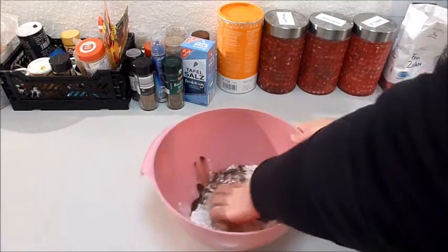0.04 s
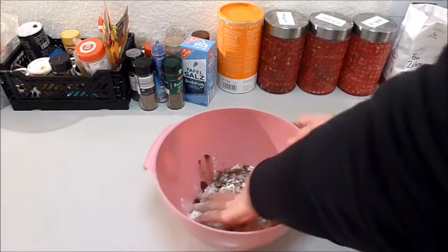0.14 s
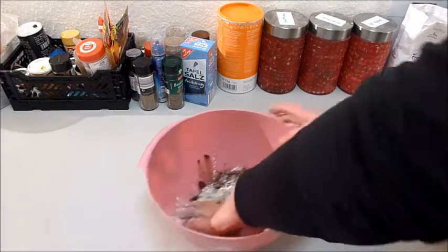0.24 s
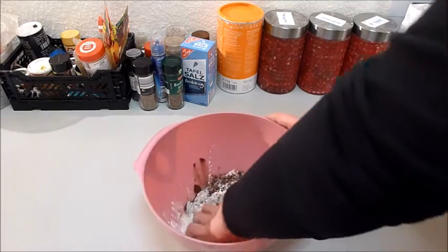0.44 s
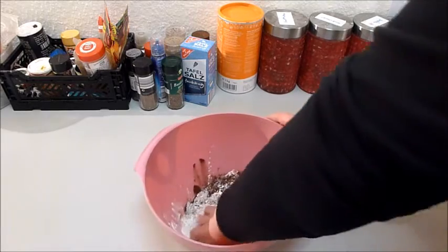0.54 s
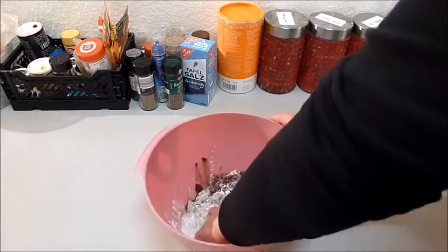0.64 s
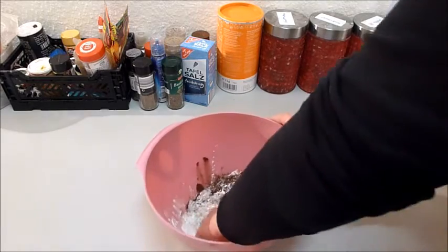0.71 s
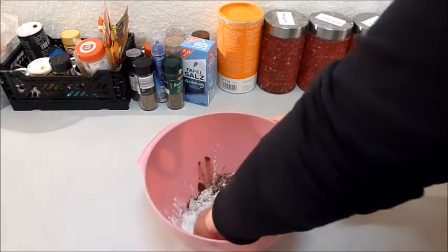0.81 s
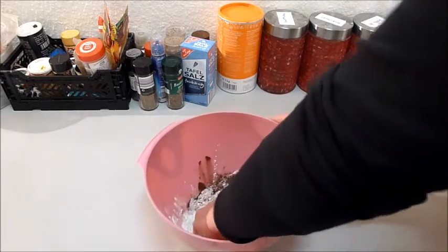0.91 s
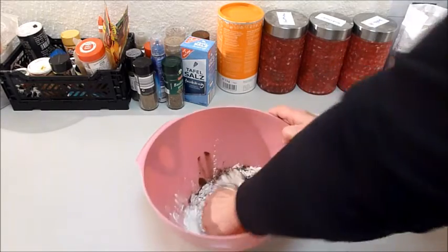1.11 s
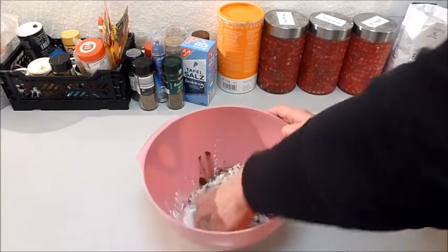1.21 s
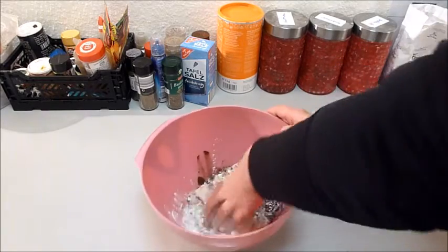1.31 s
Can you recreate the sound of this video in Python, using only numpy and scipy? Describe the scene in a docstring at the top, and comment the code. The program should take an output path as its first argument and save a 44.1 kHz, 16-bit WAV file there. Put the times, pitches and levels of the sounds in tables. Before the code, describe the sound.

Flour and butter being worked by hand in a plastic bowl, with one hollow knock.

```python
"""Working dough in a plastic bowl

A hand works flour and butter on a kitchen worktop. Crumbs rub and tick along the wall, dough gives
dully under the palm, flour swishes and a buttery finger squeaks. The bowl groans as it drags; once it
tips and knocks, ringing its modes. The small hard room rings on. Mono, with no top."""
import sys
import numpy as np
from scipy import signal
from scipy.fft import rfft, irfft
from scipy.io import wavfile

SR = 44100
rng = np.random.default_rng(int(sys.argv[2]) if len(sys.argv) > 2 else 0)


def bounce(signal):
    """Save signal as a 16-bit WAV file at the path given by the first command-line argument."""
    frames = np.transpose(np.atleast_2d(signal))
    limited = np.clip(frames, -1, 1)
    pcm = np.round(limited * 32767).astype(np.int16)
    wavfile.write(sys.argv[1], SR, pcm)


N = 59535
T = np.arange(N) / SR
CUTOFF_HZ = 8250

# finger strokes along the wall: (time [s], relative level [dB])
RUB_ENVELOPE = [(0, -52.5), (.145, -50), (.172, -39), (.205, -46), (.235, -39), (.275, -38.5),
                (.365, -40.5), (.41, -44), (.52, -39), (.58, -44.5), (.66, -40.5), (.722, -42.5),
                (.765, -51), (.89, -51.5), (.95, -43.5), (.99, -50), (1.05, -49), (1.1, -51.5),
                (1.155, -47.5), (1.2, -51.5), (1.35, -57)]
# rubbing spectrum: (frequency [Hz], relative level [dB])
RUB_SPECTRUM = [(150, -29.5), (350, -2), (800, -5), (1400, -1.5), (2500, 3.5), (3600, -2), (5000, -9.5),
                (6500, -18.5), (7500, -39.5)]
# wall resonances: (frequency [Hz], width [Hz], gain [dB])
WALL_MODES = [(1171, 32, 4.5), (1224, 72, -6.5), (1688, 81, -4), (1793, 77, -4)]
# palm on the dough: (time [s], level [dB])
PRESS_ENVELOPE = [(0, -49.5), (.14, -56), (.25, -41.5), (.5, -52.5), (.72, -51.5), (.84, -53), (1.0, -55.5),
                  (1.19, -53.5), (1.29, -52.5), (1.35, -54)]
# pressed dough spectrum: (frequency [Hz], relative level [dB])
PRESS_SPECTRUM = [(60, -45), (95, -20.5), (170, -11.5), (260, -5.5), (350, -0.5), (520, 4.5), (750, -0.5),
                  (1200, -3.5), (3000, -29.5)]
# room noise spectrum: (frequency [Hz], relative level [dB])
ROOM_NOISE_SPECTRUM = [(25, -29.5), (60, -27), (100, -14), (320, 4.5), (1000, 2.5), (3000, -3.5),
                       (6000, -11), (7500, -35)]
# bowl dragging on the worktop: (peak time [s], half-width [s], pitch [Hz], level [dB])
BOWL_DRAGS = [(0.014, 0.0094, 481, -51), (.505, 0.039, 338, -55.5), (0.578, 0.02, 374, -47),
              (1.229, 0.0081, 345, -48.5), (1.31, 0.041, 370.8, -54)]
# crumbs snapping on the wall: (time [s], relative level [dB])
CRUMB_SNAPS = [(.09, -43.5), (0.165, -40), (0.2217, -43), (0.31, -40), (0.373, -36.5), (.694, -37)]
# plastic crack spectrum: (frequency [Hz], relative level [dB])
CRACK_SPECTRUM = [(100, -14), (400, -7.5), (1000, -3.5), (2000, 4), (2700, 1.5), (3600, -5.5), (5000, -11),
                  (6500, -18.5), (7500, -33)]
# bowl hitting the worktop: (time [s], thud gain [dB], crack gain [dB])
BOWL_KNOCKS = [(.2418, -39, -35.5), (.2520, -24, -36), (.2575, -10.5, -24.5), (0.26, -36, -23.5),
               (0.277, -36.5, -30), (0.3363, -29, -40)]
# bowl modes: (frequency [Hz], relative level [dB], T60 [s])
BOWL_MODES = [(104, -32, 0.14), (220.6, -26, 0.099), (433, -11, 0.014), (491.4, -8, 0.18),
              (550.5, -11.5, 0.17), (613.4, -17.5, 0.32), (772, -31, 0.32), (1080, -20.5, 0.064),
              (1517, -19, 0.086), (1767, -17, 0.091), (1916, -19, 0.15), (2320, -31.5, .07),
              (2405, -23, 0.1), (2675, -26.5, 0.11)]
# finger squeaking up the wall: (time [s], pitch [Hz], level [dB])
SQUEAK_PATH = [(0.276, 1377, -67), (0.291, 1540, -44.5), (0.31, 1810, -48), (0.326, 1837, -53.5),
               (.345, 1810, -48.5), (0.371, 1830, -72.5)]
# dry flour swishes: (peak time [s], half-width [s], level [dB])
FLOUR_SWISHES = [(0.339, 0.054, -49), (0.516, 0.081, -56), (1.125, 0.0092, -58), (1.155, .025, -62)]
# flour spectrum: (frequency [Hz], relative level [dB])
SWISH_SPECTRUM = [(1000, -28.5), (3000, -6), (5000, 7), (6500, -4.5), (7500, -15)]


def from_db(db):
    """Decibels to gain."""
    return 10 ** (np.asarray(db) / 20)


def unit_rms(x):
    """Scale to unit rms."""
    return x / np.sqrt(np.mean(x ** 2) + 1e-20)


def coloured(x, spectrum):
    """Minimum-phase filter: given spectrum, rolled off at CUTOFF_HZ, unit power gain."""
    hz, db = np.transpose(spectrum)
    bins_hz = np.maximum(np.fft.rfftfreq(2 * N, 1 / SR), 1)
    shape = from_db(np.interp(np.log(bins_hz), np.log(hz), db))
    gain = unit_rms(shape / (1 + (bins_hz / CUTOFF_HZ) ** 20))
    cepstrum = irfft(np.log(gain + 1e-6))
    causal_fold = np.concatenate([[1], np.full(N - 1, 2), [1], np.zeros(N - 1)])
    return irfft(rfft(x, 2 * N) * np.exp(rfft(cepstrum * causal_fold)))[:N]


def drift(rate_hz):
    """Smooth random wander, unit rms."""
    r = np.exp(-2 * np.pi * rate_hz / SR)
    return unit_rms(signal.lfilter([1], [1, -2 * r, r * r], rng.standard_normal(2 * N))[N:])


def resonance(x, hz, width_hz):
    """Band-pass, unit peak gain."""
    r = np.exp(-np.pi * width_hz / SR)
    feedback = [1, -2 * r * np.cos(2 * np.pi * hz / SR), r * r]
    return signal.lfilter(np.array([1, 0, -1]) * (1 - r * r) / 2, feedback, x)


def decay(start_s, t60_s):
    """Step to 1, then exponential decay."""
    return (T >= start_s) * np.exp(-np.log(1000) * np.maximum(T - start_s, 0) / t60_s)


def swell(peak_s, half_width_s):
    """Gaussian envelope, 1/e at the half-width."""
    return np.exp(-((T - peak_s) / half_width_s) ** 2)


def tone(pitch_hz):
    """Unit-rms sine along a pitch curve."""
    return np.sqrt(2) * np.sin(2 * np.pi * np.cumsum(pitch_hz) / SR)


def impulses(times_s, levels_db):
    """One impulse per contact."""
    out = np.zeros(N)
    np.add.at(out, (np.asarray(times_s) * SR).astype(int), from_db(levels_db))
    return out


def grains(slips_per_s=2500, spread_db=1, powder_db=-1, judder_db=1.4, judder_hz=15):
    """Tiny uneven slips over a powdery hiss, in a juddering flow."""
    sizes = from_db(spread_db * np.minimum(rng.exponential(1, N), 4)) * rng.choice([-1, 1], N)
    slips = unit_rms(sizes * (rng.random(N) < slips_per_s / SR))
    powder = from_db(powder_db) * rng.standard_normal(N)
    judder = from_db(judder_db * drift(judder_hz))
    return unit_rms((slips + powder) * judder)


def rubbing(gain_db=-1.5):
    """Crumbs slide along the plastic and excite the wall."""
    friction = coloured(grains(), RUB_SPECTRUM)
    wall = sum(from_db(db) * resonance(friction, hz, width_hz) for hz, width_hz, db in WALL_MODES)
    level_db = np.interp(T, *np.transpose(RUB_ENVELOPE)) + gain_db
    return from_db(level_db) * unit_rms(friction + wall)


def pressing():
    """Slips under the palm, muffled inside the dough."""
    level_db = np.interp(T, *np.transpose(PRESS_ENVELOPE))
    return from_db(level_db) * unit_rms(coloured(grains(), PRESS_SPECTRUM))


def background(noise_db=-54, hum_hz=341.1, hum_db=-64.5):
    """Steady room noise with a faint hum."""
    noise = unit_rms(coloured(rng.standard_normal(N), ROOM_NOISE_SPECTRUM))
    return from_db(noise_db) * noise + from_db(hum_db) * tone(np.full(N, hum_hz))


def room(x, delay_s=0.0066, t60_s=0.61):
    """Dense kitchen reflections, unit energy."""
    tail = rng.standard_normal(N) * decay(delay_s, t60_s)
    return signal.fftconvolve(x, tail / np.linalg.norm(tail))[:N]


def dragging(waver_hz=22.3):
    """The bowl's foot drags in short, unsteady groans."""
    out = np.zeros(N)
    for peak_s, half_width_s, hz, db in BOWL_DRAGS:
        out += from_db(db) * swell(peak_s, half_width_s) * tone(hz + waver_hz * drift(rate_hz=39))
    return out


def cracks(times_s, levels_db, t60_s, tick_db=13):
    """Sharp ticks with brief chatter, coloured by the plastic."""
    envelope = sum(from_db(db) * decay(start_s, t60_s) for start_s, db in zip(times_s, levels_db))
    chatter = envelope * rng.standard_normal(N)
    ticks = from_db(tick_db) * impulses(times_s, levels_db)
    return coloured(chatter + ticks, CRACK_SPECTRUM)


def snapping():
    """Larger crumbs tick on the wall."""
    return cracks(*np.transpose(CRUMB_SNAPS), t60_s=0.024)


def knocking(low_cut_hz=220, room_db=-2.5):
    """Each contact rings the bowl's modes, neighbours in opposite sign, with a crack of plastic."""
    times_s, thud_db, crack_db = np.transpose(BOWL_KNOCKS)
    ring = sum((-1) ** k * from_db(db) * decay(0, t60_s) * np.sin(2 * np.pi * hz * T)
               for k, (hz, db, t60_s) in enumerate(BOWL_MODES))
    thud = signal.fftconvolve(impulses(times_s, thud_db), ring)[:N]
    thud = signal.sosfilt(signal.butter(2, low_cut_hz, "high", fs=SR, output="sos"), thud)
    crack = cracks(times_s, crack_db, t60_s=0.02)
    return thud + crack + from_db(room_db) * room(crack)


def squeaking(waver_hz=35):
    """Buttery skin on plastic: a short, rough, rising whistle."""
    times_s, hz, db = np.transpose(SQUEAK_PATH)
    pitch_hz = np.interp(T, times_s, hz) + waver_hz * drift(rate_hz=200)
    gate = (T > times_s[0]) * (T < times_s[-1])
    return gate * from_db(np.interp(T, times_s, db)) * tone(pitch_hz)


def swishing():
    """Loose flour hisses through the fingers."""
    envelope = sum(from_db(db) * swell(peak_s, half_width_s) for peak_s, half_width_s, db in FLOUR_SWISHES)
    return envelope * unit_rms(coloured(rng.standard_normal(N), SWISH_SPECTRUM))


def scene(room_db=-8):
    """Hand, bowl and room, alike in both channels."""
    hand = rubbing() + snapping() + swishing() + squeaking()
    mono = hand + from_db(room_db) * room(hand) + pressing() + dragging() + knocking() + background()
    return np.array([mono, mono])


def record(dry, low_cut_hz=85):
    """The microphone drops the deep bass; the top is cut steeply."""
    thin = signal.sosfilt(signal.butter(6, low_cut_hz, "high", fs=SR, output="sos"), dry)
    return signal.sosfilt(signal.cheby2(16, 70, CUTOFF_HZ, fs=SR, output="sos"), thin)


dry = scene()
out = record(dry)
bounce(out)
```